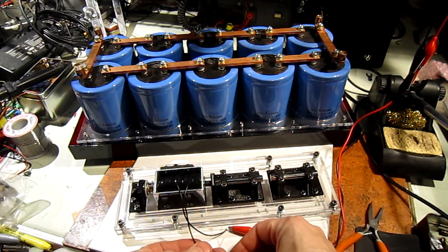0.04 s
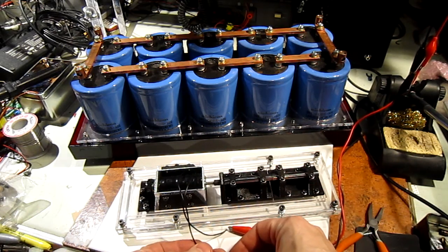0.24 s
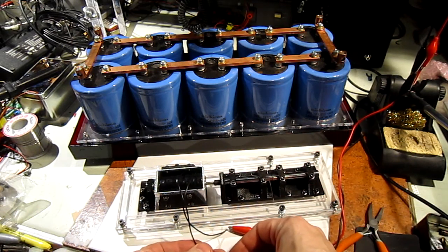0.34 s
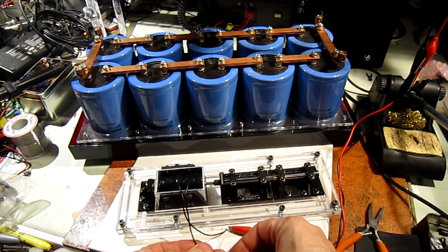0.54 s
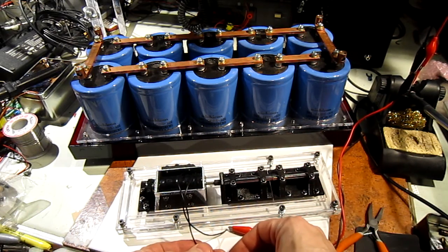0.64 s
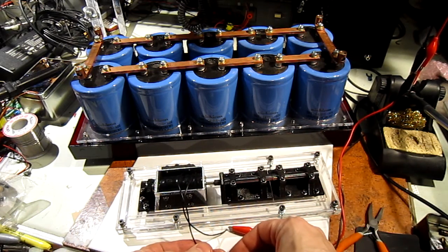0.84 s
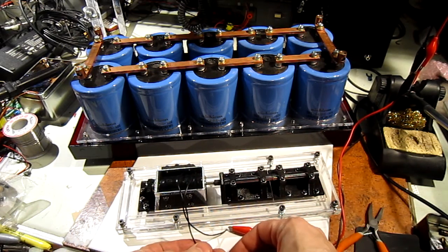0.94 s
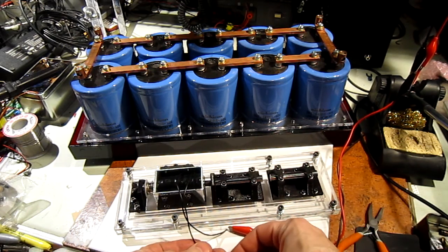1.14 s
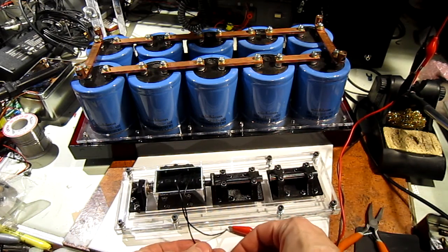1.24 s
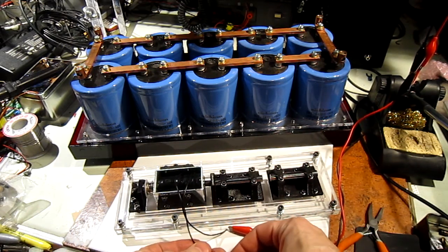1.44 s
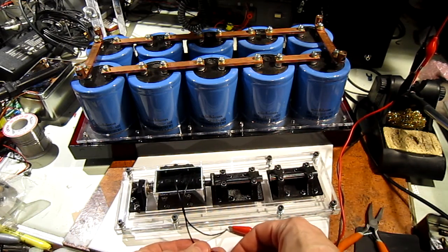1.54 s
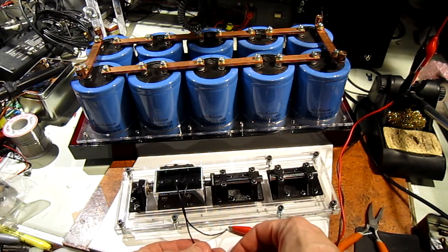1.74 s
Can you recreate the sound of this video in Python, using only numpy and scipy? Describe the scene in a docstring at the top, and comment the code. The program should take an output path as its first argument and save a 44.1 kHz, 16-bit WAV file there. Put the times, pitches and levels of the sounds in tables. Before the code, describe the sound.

A solenoid-driven switch slams its plunger home with a hard bright steel clack, then a tiny tick and a duller, chattering clack as it springs back; close microphone, workshop hiss and hum dipping after each hit.

```python
"""A home-made solenoid contactor on a workbench pulls in with a bright steel clack, then drops out duller and chattering.
Each blow is a crack of noise, a dense ring, a room tail and the ringing tones of the base and steel parts.
Before each stop the plunger slides with a rubbing noise; just before pull-in the base also shudders.
The supply lead ticks as it lets go, and later something knocks softly on the bench.
Behind it a workshop hisses and hums; a gain control ducks it after each clack and slowly brings it back."""
import sys
import numpy as np
from scipy import signal
from scipy.fft import rfft, irfft
from scipy.io import wavfile
from scipy.ndimage import uniform_filter1d, minimum_filter1d

SR = 44100
rng = np.random.default_rng(int(sys.argv[2]) if len(sys.argv) > 2 else 0)


def file_out(sig):
    """Save sig as 16-bit WAV at sys.argv[1]."""
    # one column per channel
    cols = np.atleast_2d(sig).T
    # limit, then scale
    lim = np.clip(cols, -1, 1)
    pcm = np.round(lim * 32767).astype(np.int16)
    wavfile.write(sys.argv[1], SR, pcm)


N = 79380  # length in samples: 1.8 s


def undb(db):
    """Turn decibels into a gain."""
    return 10 ** (np.asarray(db) / 20)


def at(points, hz):
    """Read a curve of (Hz, value) points, with straight lines on a log-frequency axis."""
    p = np.array(points)
    return np.interp(np.log(hz + 1), np.log(p[:, 0]), p[:, 1])


def noise(gain):
    """Noise of rms 1: every frequency has the strength gain(Hz) and a random phase."""
    hz = np.arange(N // 2 + 1) * SR / N
    phases = np.exp(2j * np.pi * rng.random(len(hz)))
    x = irfft(gain(hz) * phases, N)
    return x / x.std()


def hum_noise(centre_hz, width_hz):
    """A narrow peak of noise, half as strong at width_hz either side, heard as a wavering tone."""
    return noise(lambda hz: 1 / (1 + ((hz - centre_hz) / width_hz) ** 2))


def coloured(colour, tilt_db=0):
    """Noise of a given colour, tilted by so many dB an octave."""
    return noise(lambda hz: undb(at(colour, hz) + tilt_db * np.log2(hz + 1)))


def since(start):
    """Seconds since a moment, negative before it."""
    return np.arange(N) / SR - start


def fade(start, t60):
    """A sudden start, then an exponential decay that falls 60 dB in t60 seconds."""
    t = since(start)
    return (t >= 0) * np.exp(-np.log(1000) * np.maximum(t, 0) / t60)


def fades(contacts, t60):
    """One fade for each contact, added as power because their noises are unrelated."""
    power = sum((undb(db) * fade(start, t60)) ** 2 for start, db in contacts)
    return np.sqrt(power)


# Colour of the workshop air: pitch_hz, relative level_db (per Hz)
AIR_COLOUR = [(20, -3), (55, -9), (82, -14.5), (115, -10), (155, -13), (210, 0), (290, -7.5), (400, -10.5),
              (620, -19.5), (1400, -23), (2900, -28.5), (4200, -33.5), (8000, -38), (12000, -41.5),
              (16000, -49)]
# Wavering tones of the machine hum: pitch_hz, width_hz, level_db (rms)
MACHINE_HUM = [(55, 5, -52), (118, 5, -57), (197, 10, -54), (219.2, 24, -48.5), (271.5, 8, -51)]
AIR_DB = -43.5  # rms level of the hiss


def workshop():
    """Steady noise for the air, plus narrow noise peaks for the wavering machine hum."""
    hum = sum(undb(db) * hum_noise(centre, width) for centre, width, db in MACHINE_HUM)
    return undb(AIR_DB) * coloured(AIR_COLOUR) + hum


def dense_ring(contacts, colour, decays, tilt_db):
    """Countless close resonances fed by every contact; each octave dies at its own rate."""
    spectrum = rfft(coloured(colour, tilt_db))
    centres = 250 * 2. ** np.arange(7)  # octaves, Hz
    hz = np.arange(len(spectrum)) * SR / N
    out = 0
    for centre in centres:
        share = at(np.c_[centres, centres == centre], hz)  # 1 at this octave, 0 at its neighbours
        band = irfft(spectrum * share, N)
        out = out + band * fades(contacts, at(decays, centre))
    return out


# How long the short dense ring takes to fall 60 dB: pitch_hz, t60_s
BODY_DECAY = [(300, 0.11), (1500, .085), (5000, 0.087), (14000, .05)]
# How long the room's tail takes to fall 60 dB: pitch_hz, t60_s
ROOM_DECAY = [(300, .3), (2500, 0.31), (8000, .21), (14000, .18)]


def impact(contacts, colour, crack_t60, body_db, room_db, body_tilt_db=0, room_tilt_db=0):
    """Each contact sets off a noise crack, a short dense ring and the room's tail."""
    crack = coloured(colour) * fades(contacts, crack_t60)
    body = undb(body_db) * dense_ring(contacts, colour, BODY_DECAY, body_tilt_db)
    room = undb(room_db) * dense_ring(contacts, colour, ROOM_DECAY, room_tilt_db)
    return crack + body + room


# Colour of the soft knock: pitch_hz, relative level_db (per Hz)
BENCH_KNOCK = [(80, -4), (280, 6.5), (600, -13), (2000, -17), (5000, -29), (12000, -32)]
KNOCK_S, KNOCK_DB = 1.6935, -37  # start and crack level


def bench_knock():
    """Something knocks softly on the bench: one weak, mostly low impact."""
    return impact([(KNOCK_S, KNOCK_DB)], BENCH_KNOCK, crack_t60=.024, body_db=-6.5, room_db=-28)


# Colour of the lead's tick: pitch_hz, relative level_db (per Hz)
LEAD_TICK = [(300, -9.5), (2300, -10), (3100, -3), (5500, 1.5), (8500, -7.5), (12000, -2.5), (16000, -24)]
TICK_S, TICK_DB = 0.9499, -19  # start and crack level


def lead_tick():
    """The supply lead leaves its terminal: one bright, very short impact."""
    return impact([(TICK_S, TICK_DB)], LEAD_TICK, crack_t60=0.0043, body_db=-17, room_db=-30.5)


# Colour of the plunger rubbing in its sleeve, before tilt: pitch_hz, relative level_db (per Hz)
SLIDE_RUB = [(150, -20), (400, -7), (750, 2.5), (1500, -3.5), (3000, -13.5), (5500, -14.5), (8000, -22.5),
             (15000, -32)]


def slide(stop, length_s, rise_db, level_db, tilt_db):
    """The plunger rubs louder as it gathers speed, until it meets the stop."""
    travel = since(stop) / length_s + 1  # 0 at the start of the slide, 1 at the stop
    moving = np.clip(travel / 0.34, 0, 1) * (travel < 1)
    loudness_db = level_db + rise_db * (np.clip(travel, 0, 1) - 1)
    return coloured(SLIDE_RUB, tilt_db) * moving * undb(loudness_db)


SHUDDER_HZ, SHUDDER_S = 690, 0.016  # pitch and length
SHUDDER_DB, SHUDDER_RISE_DB = -30, 6  # level reached at the stop, and the climb up to it


def shudder(stop):
    """The base shudders at one low resonance as the coil's pull builds; the blow cuts it short."""
    travel = since(stop) / SHUDDER_S + 1  # 0 at the start of the shudder, 1 at the stop
    loudness_db = SHUDDER_DB + SHUDDER_RISE_DB * (np.clip(travel, 0, 1) - 1)
    swell = np.clip(5 * travel, 0, 1) * undb(loudness_db) * (travel < 1)
    return swell * np.sin(2 * np.pi * (SHUDDER_HZ * since(stop) + rng.random()))


# Ringing tones of the base and frame: pitch_hz, pull_in level_db, drop_out level_db, t60_s
BASE_TONES = [(103, -41.5, -27, 0.22), (427, -21, -25, 0.21), (592, -21.5, -16.5, 0.13),
              (697, -20, -19.5, 0.13), (811.7, -18.5, -7.5, .11), (857, -4.5, -13, .11),
              (904, -25.5, -7.5, .08), (982, -19, -6.5, .09), (1151, -23, -11.5, 0.14),
              (1295, -15, -15, 0.1), (1399, -16, -15.5, 0.14), (1473, -5, -7.5, 0.061),
              (1559.6, -16.5, -11, 0.15), (1715, -17, -11, .1)]
# Ringing tones of the plunger and contacts: pitch_hz, pull_in level_db, drop_out level_db, t60_s
STEEL_TONES = [(1980, -18.5, -19.5, .11), (2184, -15.5, -17.5, .13), (2330, -12, -26.5, 0.12),
               (2484, -11, -20.5, 0.17), (2630, -3.5, -25, .08), (2710, -15, -13, .09),
               (2950, -1.5, -11.5, 0.082), (3135, -3.5, -11.5, .08), (3545, -27, -21.5, 0.19),
               (4537, -4, -21, 0.13), (4650, -16, -39, 0.32), (4626, -7.5, -30, 0.17),
               (6120, -13, -28, .08), (9100, -9.5, -31, .11)]
PULL_IN_COLUMN, DROP_OUT_COLUMN = 1, 2
BLUR_HZ, BLUR_S, BLUR_SHARE = 45, .02, .85  # width, time to set in, final share of the power


def ring(start, level_column, build_s):
    """Base and steel tones build up as the plunger chatters; pure at first, then blurred by reflections."""
    t = since(start)
    blur = BLUR_SHARE * np.clip(t / BLUR_S, 0, 1)
    out = 0
    for tone in BASE_TONES + STEEL_TONES:
        pitch_hz, level_db, t60 = tone[0], tone[level_column], tone[3]
        pure = np.sin(2 * np.pi * (pitch_hz * t + rng.random()))
        blurred = hum_noise(pitch_hz, BLUR_HZ)
        # halving the noise power matches it to the sine
        mix = np.sqrt(1 - blur) * pure + np.sqrt(blur / 2) * blurred
        out = out + undb(level_db) * fade(start, t60) * mix
    return out * np.clip(t / build_s, 0, 1)


# Plunger hits on the rear stop: start_s, crack level_db
DROP_OUT_HITS = [(1.0443, -5), (1.0467, -4), (1.0483, -3.5), (1.0500, -3), (1.0524, -17)]
# Colour of the crack, and of the dense ring and room before tilt: pitch_hz, relative level_db (per Hz)
DROP_OUT_COLOUR = [(150, -27.5), (380, -17), (800, -11.5), (1600, -0.5), (2100, -7.5), (3100, -3),
                   (4000, -7), (5000, -4), (7800, -3.5), (10000, -9.5), (13000, -8.5), (16000, -23)]


def drop_out():
    """The spring throws the plunger back, and it chatters on the rear stop."""
    start = DROP_OUT_HITS[0][0]
    blow = impact(DROP_OUT_HITS, DROP_OUT_COLOUR, crack_t60=0.011, body_db=-8, room_db=-23.5,
                  body_tilt_db=-2.5, room_tilt_db=-1.8)
    tones = ring(start, DROP_OUT_COLUMN, build_s=0.0035)
    rub = slide(start, length_s=0.045, rise_db=12, level_db=-34.5, tilt_db=1.0)
    return blow + tones + rub


# Plunger hits on the front stop: start_s, crack level_db
PULL_IN_HITS = [(0.2287, 16), (0.2295, 14.5), (0.2340, -1), (0.2362, 3)]
# Colour of the crack, and of the dense ring and room before tilt: pitch_hz, relative level_db (per Hz)
PULL_IN_COLOUR = [(150, -38.5), (400, -23.5), (700, -16), (1400, -9.5), (2800, 1), (3700, -10), (4500, 5.5),
                  (5300, -6.5), (7200, -5.5), (9000, 2), (10800, 0), (11500, -7.5), (13300, -3.5),
                  (16000, -18)]


def pull_in():
    """The coil slams the plunger home, steel on steel."""
    start = PULL_IN_HITS[0][0]
    blow = impact(PULL_IN_HITS, PULL_IN_COLOUR, crack_t60=0.0054, body_db=-16.5, room_db=-30.5,
                  body_tilt_db=-2.0, room_tilt_db=-2)
    tones = ring(start, PULL_IN_COLUMN, build_s=.001)
    rub = slide(start, length_s=.032, rise_db=20.5, level_db=-31, tilt_db=0.5)
    return blow + tones + shudder(start) + rub


def scene():
    """One stroke in and one stroke out, with the tick, the knock and the workshop behind."""
    mix = workshop() + bench_knock() + lead_tick() + drop_out() + pull_in()
    return mix[None]  # one channel


THRESHOLD_DB, RATIO = -14.5, 3.6  # ducking starts above this level; dB in per dB out
DETECT_S, HOLD_S, RELEASE_S = .006, 0.13, 0.44  # averaging, hold, recovery time constant
TOP_HZ = 16000


def record(dry):
    """Gain control that ducks at once, holds and recovers slowly; sharp peaks clip and the top is cut."""
    power = uniform_filter1d(dry[0] ** 2, max(int(DETECT_S * SR), 1))
    level_db = 10 * np.log10(np.maximum(power, 1e-12))
    wanted_db = np.maximum(level_db - THRESHOLD_DB, 0) * (1 - 1 / RATIO)
    # hold: the deepest ducking wanted over the last HOLD_S
    half = int(HOLD_S * SR / 2)
    held_db = -minimum_filter1d(-wanted_db, 2 * half + 1, origin=half, mode="constant")
    # recover: the ducking in dB shrinks exponentially unless a deeper one is held
    recovery = np.exp(-since(0) / RELEASE_S)
    duck_db = np.maximum.accumulate(held_db / recovery) * recovery
    clipped = np.clip(dry * undb(-duck_db), -1, 1)
    lowpass = signal.ellip(8, .2, 70, TOP_HZ, fs=SR, output="sos")
    return signal.sosfilt(lowpass, clipped)


dry = scene()
out = record(dry)
file_out(out)
```